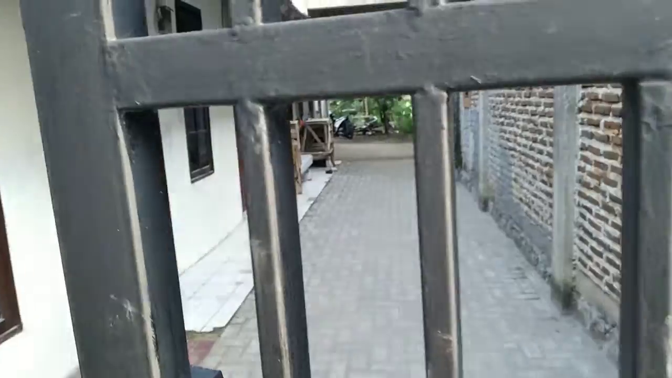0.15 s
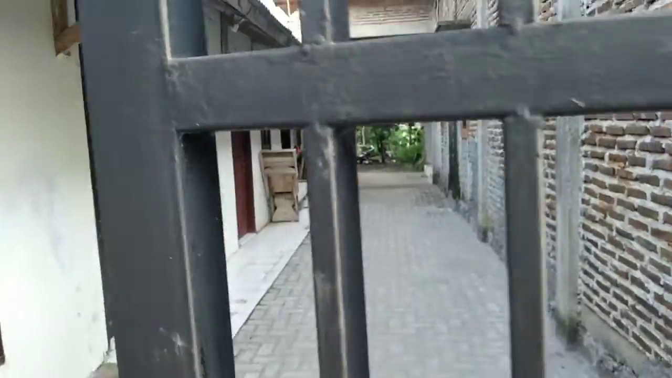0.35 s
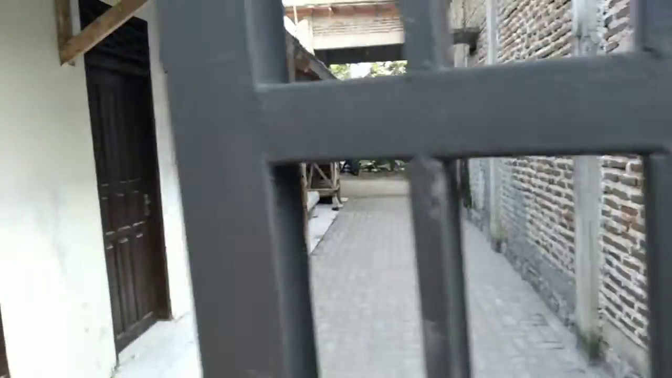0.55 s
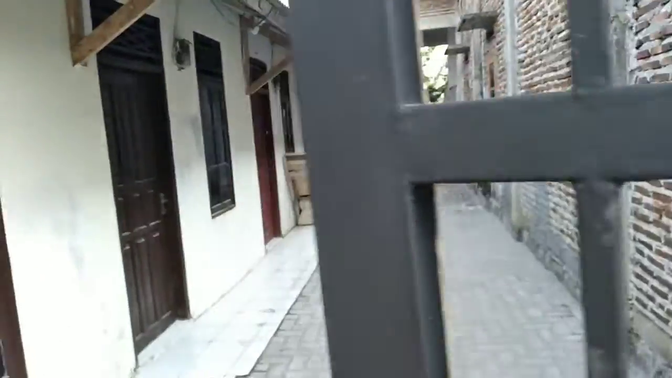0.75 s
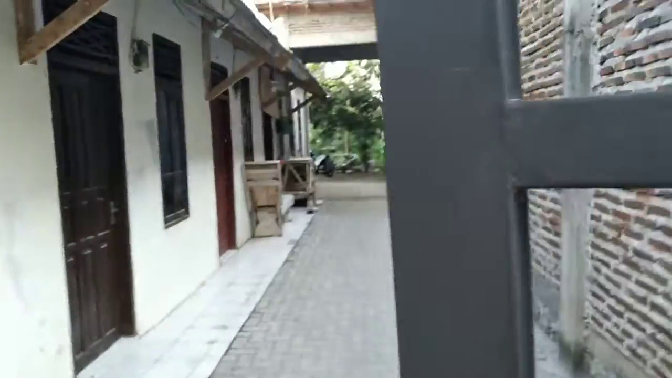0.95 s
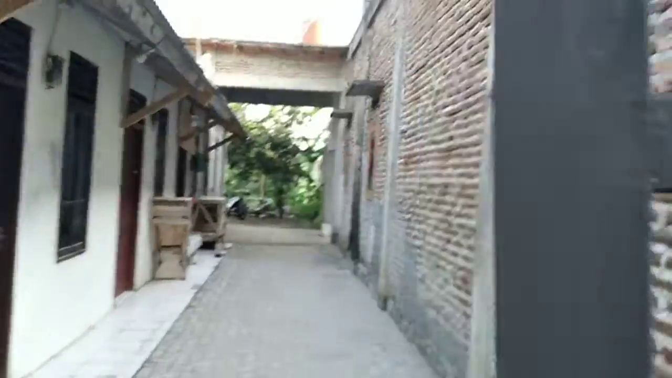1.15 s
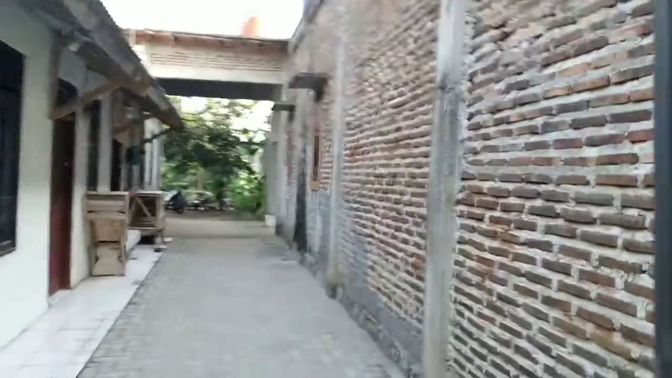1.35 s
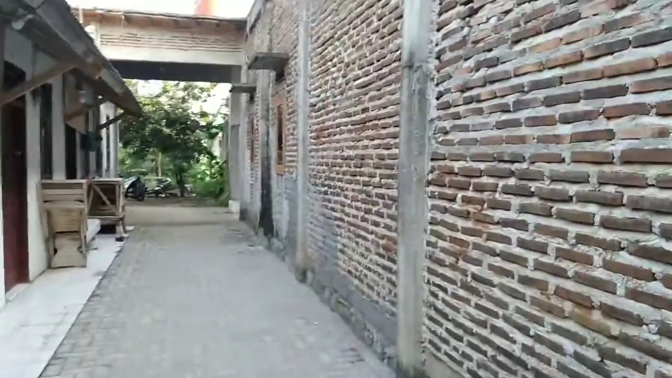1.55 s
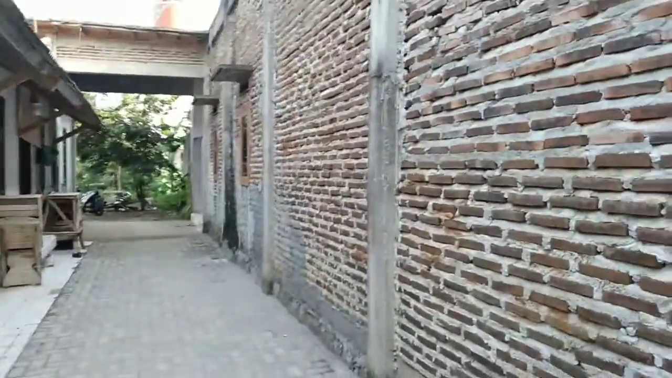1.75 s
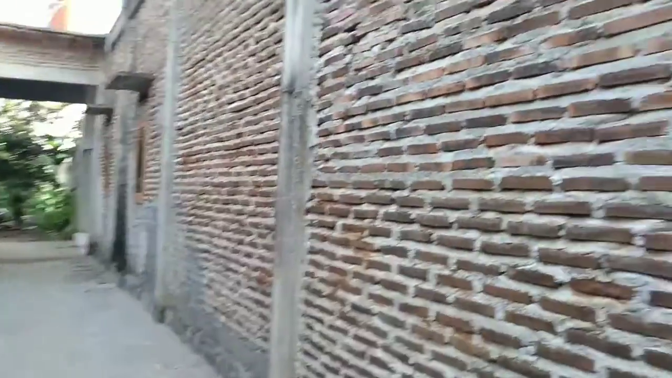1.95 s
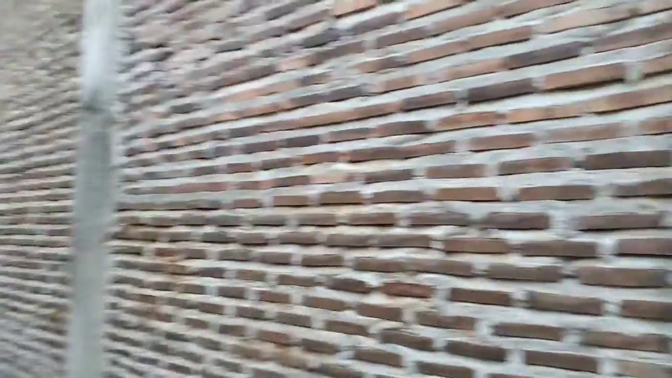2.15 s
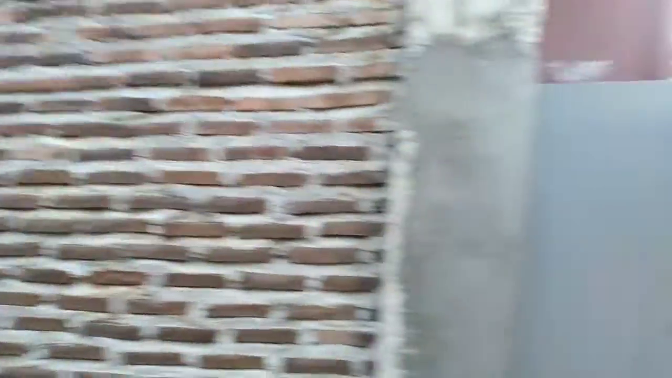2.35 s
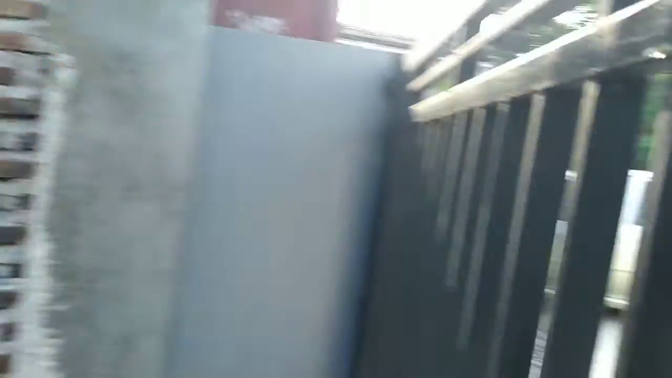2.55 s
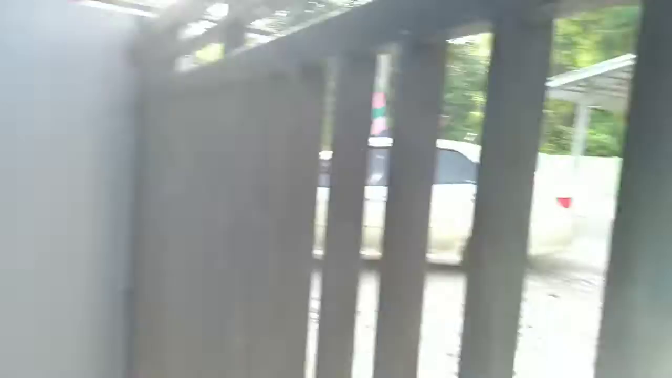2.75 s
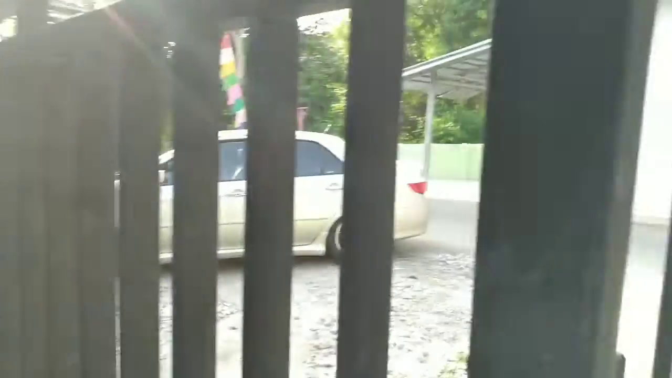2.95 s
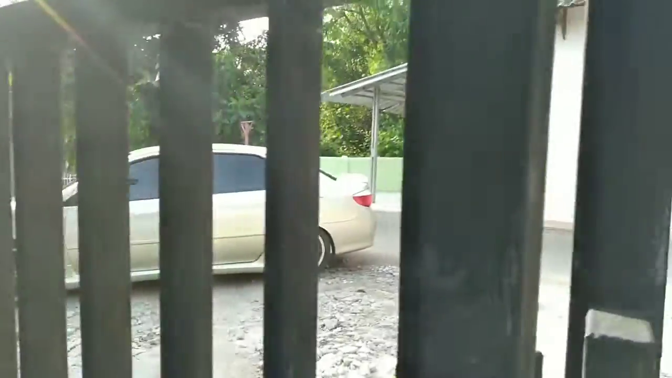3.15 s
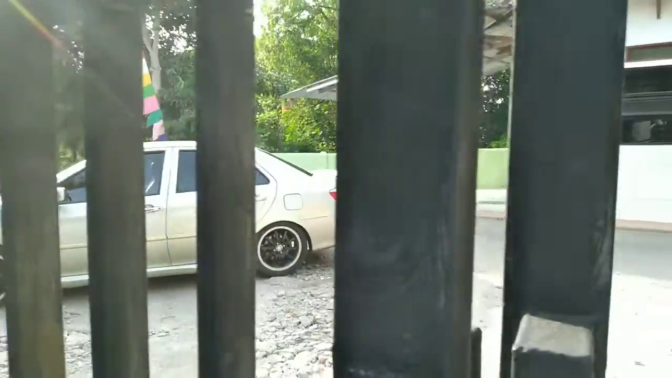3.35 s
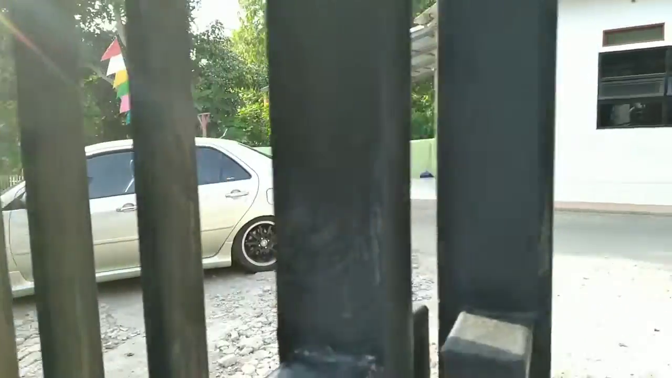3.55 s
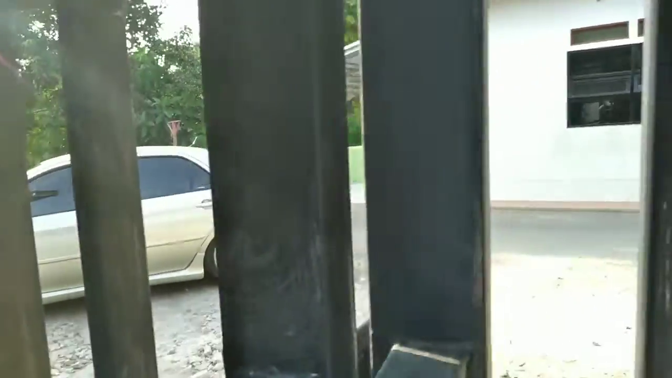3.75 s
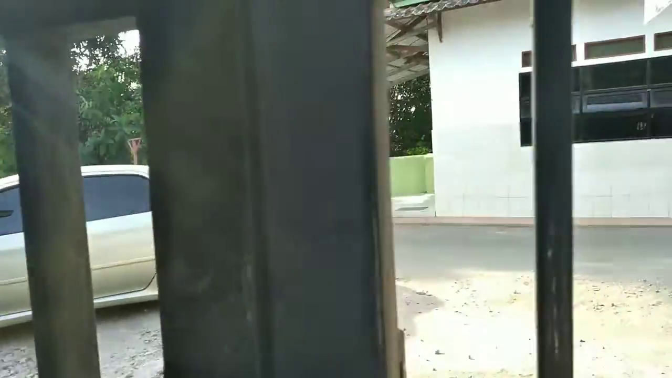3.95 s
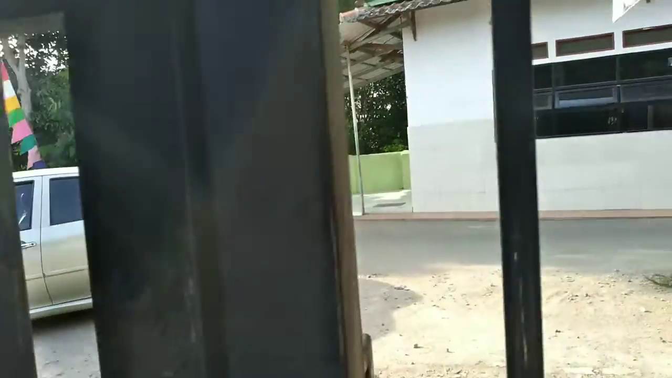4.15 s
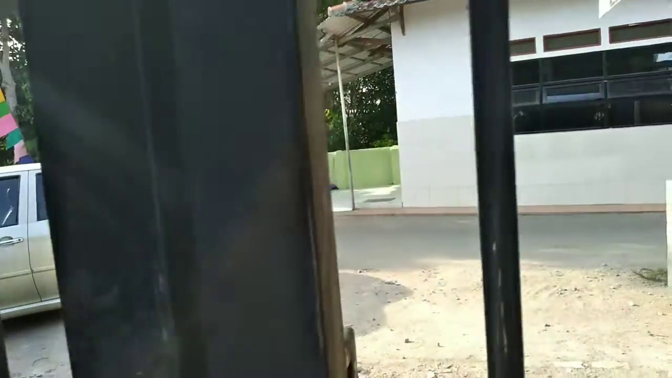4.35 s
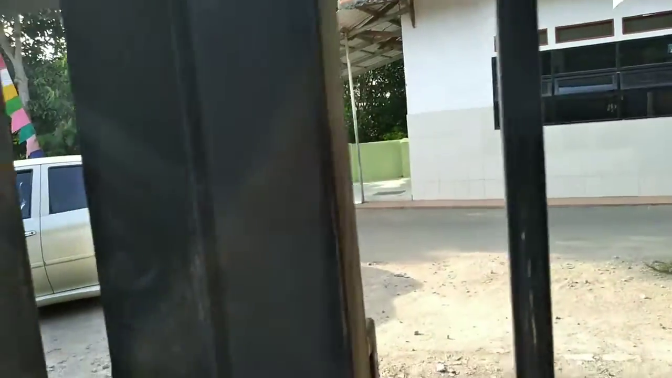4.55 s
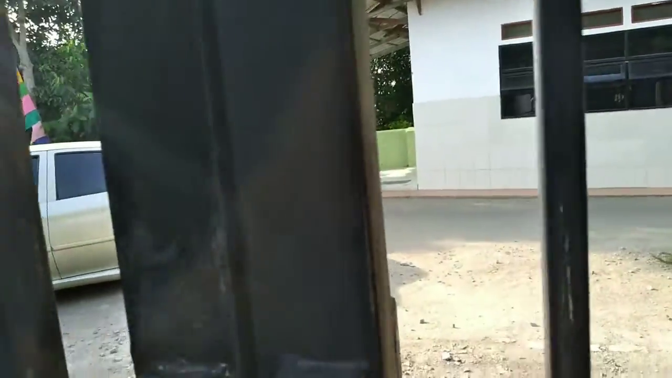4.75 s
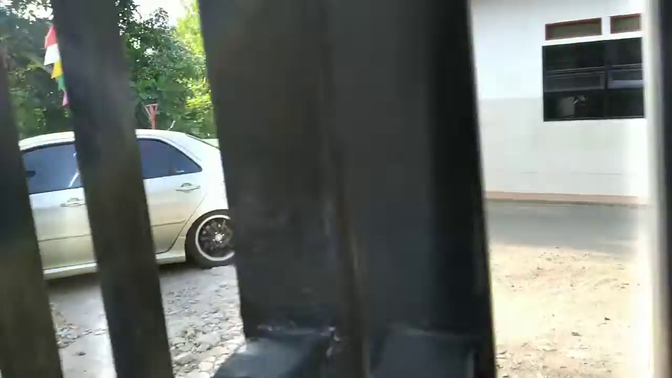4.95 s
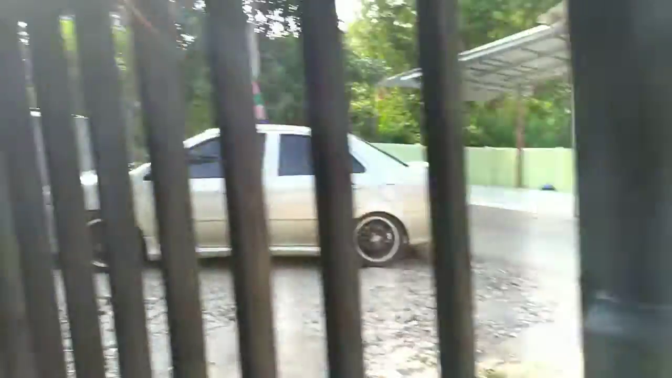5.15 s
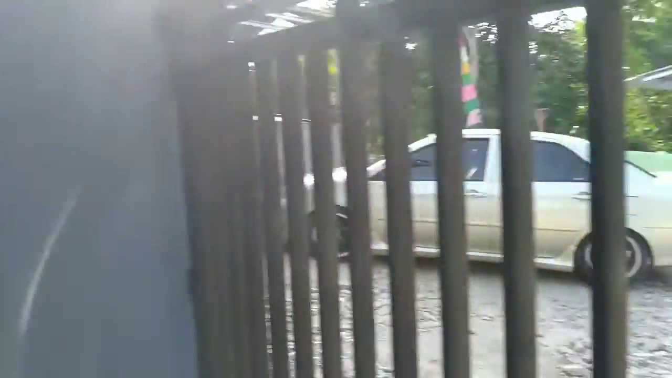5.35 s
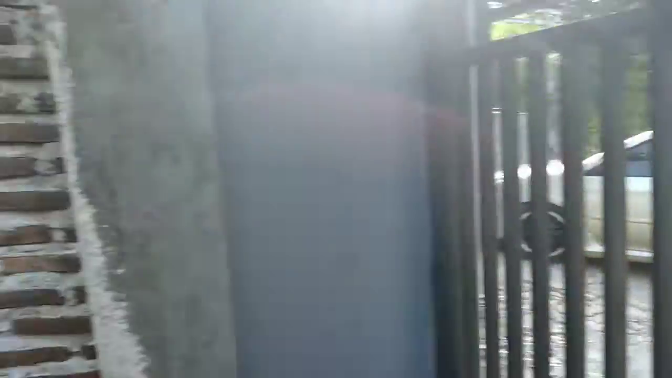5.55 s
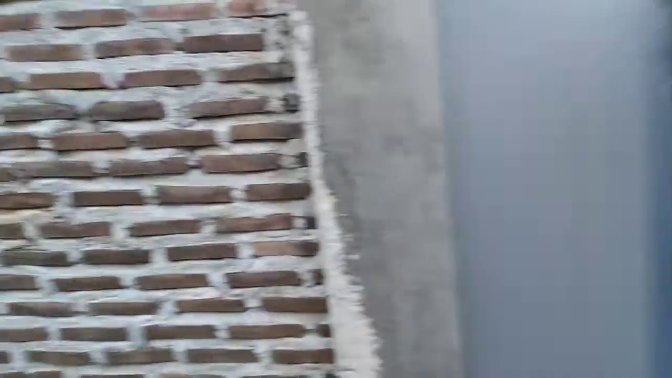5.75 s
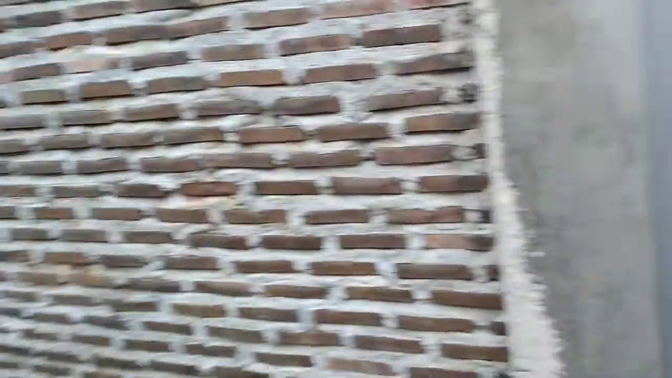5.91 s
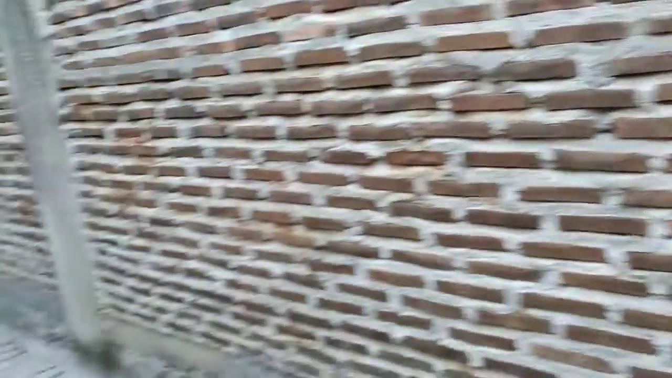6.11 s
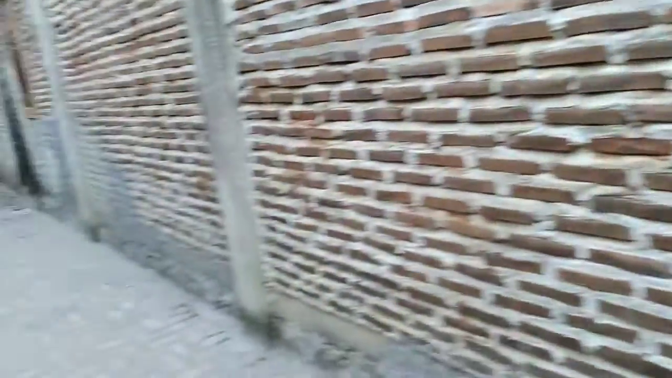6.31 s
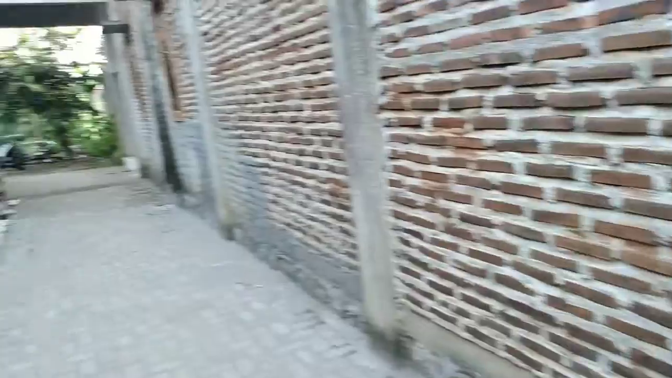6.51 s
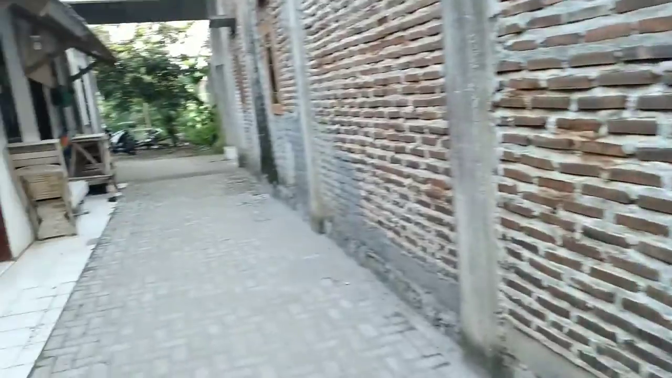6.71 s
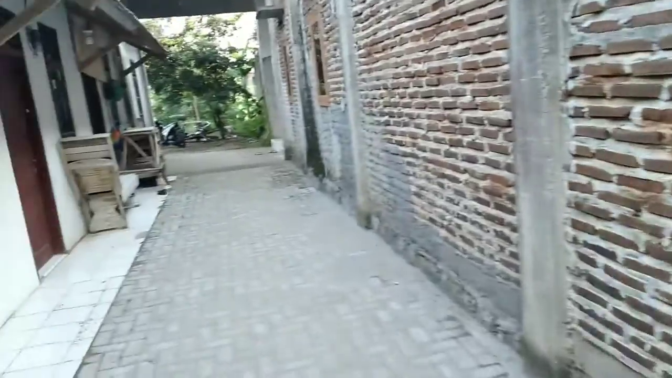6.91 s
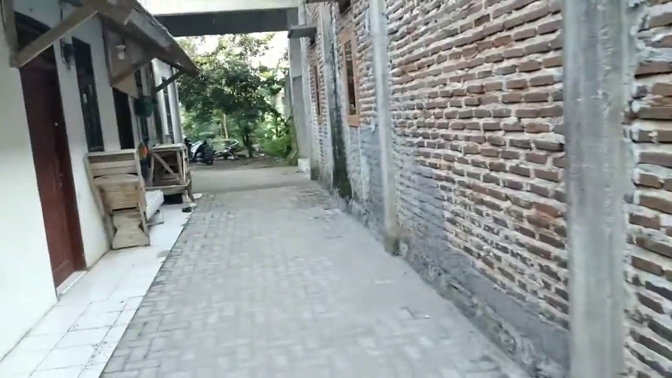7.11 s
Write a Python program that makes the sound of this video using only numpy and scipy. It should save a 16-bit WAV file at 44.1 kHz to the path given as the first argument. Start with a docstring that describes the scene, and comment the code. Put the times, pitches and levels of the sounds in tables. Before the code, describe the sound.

Handheld close-up outdoors: low town rumble, faint motor hum and light wind on the microphone. First light gate taps and humming bars, then grainy shoe scuffs, a faint squeak and a few clicks. Around the middle comes a loud clattering steel slam, several uneven blows with latch ringing, overloading the left side. Afterwards only rustling steps and patchy hiss, with treble dropping out abruptly between sounds.

```python
"""A steel bar gate is pushed open in a brick alley, then slammed so that bars and latch rattle.
Blows mix a noisy clatter with dying sines; loose clinks keep striking the bars, which hum as it swings.
The walker's scuffs are grainy hiss; dry clicks, light taps and a faint squeak fall between them.
Town rumble, a motor hum and light wind lie beneath; between sounds the treble drops out abruptly.
The loudest blows overload the left microphone."""
import sys
import numpy as np
from scipy import signal
from scipy.fft import rfft, irfft
from scipy.io import wavfile
from scipy.ndimage import uniform_filter1d

SR = 44100
rng = np.random.default_rng(int(sys.argv[2]) if len(sys.argv) > 2 else 0)


def persist_wave(psi):
    """Save psi, clipped to +-1, as 16-bit WAV."""
    counts = np.round(np.clip(psi, -1, 1) * 32767).astype(np.int16)
    wavfile.write(sys.argv[1], SR, np.atleast_2d(counts).T)


N = 316630

# Blows on the gate: (time [s], level before pan and mix [dB], brightness [dB],
# chatter before the fade, held to 2-100 ms [s])
GATE_BLOWS = [(0.481, -42, -5.5, 0.085), (0.585, -35, -3.5, 0.0024), (1.039, -44.5, -14.5, 0.015),
              (1.074, -41.5, 1, 0.021), (1.097, -36, -6, 0.021), (3.984, -26, -21, 0.02),
              (4.011, -22.5, -9, 0.037), (4.225, -13, 7, 0.018), (4.382, -22.5, -1.5, 0.0027),
              (4.474, -27.5, -5, 0.0058), (4.535, -22.5, -5.5, 0.0019), (4.589, -24.5, -4.5, 0.044),
              (4.622, -17.5, -3.5, 0.0097), (4.638, -4.5, 0.5, 0.025), (4.745, -20.5, -10.5, 0.038),
              (4.792, -9, 2.5, 0.016), (4.837, -19, -13.5, 0.03), (4.981, -34.5, -16.5, 0.081),
              (5.082, -28, -8, 0.034), (5.33, -36, 2, 0.0022)]
# Ringing bars of the gate: (pitch [Hz], relative level [dB], base t60 [s])
BAR_MODES = [(250, -14, .2), (302, -16, .18), (434, -9, .2), (540, -10, .15), (738, -7, .12), (841, 4, .3),
             (915, 0, .18), (1004, -7, .13), (1185, -8, .12), (1423, -8, .12), (1884, -4, .12),
             (2126, -7, .13), (2443, -3, .11), (2623, -4, .1), (2780, -6, .09), (3090, -9, .12),
             (3944, -9, .07), (4414, -21, .16), (5800, -20, .08), (6630, -27, .17)]
# Base decay of the frame and its small parts: (frequency [Hz], t60 [s])
FRAME_DECAY = [(800, 0.67), (2500, 0.33), (5000, 0.15), (10000, 0.12)]
# Spectrum of gritty hiss, under the sole and in the alley: (frequency [Hz], relative level per Hz [dB])
GRIT_SPECTRUM = [(250, -14), (600, -1.5), (1200, -3), (2200, 4.5), (3300, 0), (5500, -6), (8200, -3),
                 (10300, -16.5), (15000, -35)]


def amp(db):
    """Turns decibels into an amplitude factor."""
    return 10 ** (np.asarray(db) / 20)


def evened(x):
    """Scales a signal to unit RMS."""
    return x / np.sqrt(np.mean(abs(x) ** 2) + 1e-20)


def read(points, hz):
    """Reads a curve of (frequency, value) points on a logarithmic frequency axis."""
    f, value = np.transpose(points)
    return np.interp(np.log(hz + 1), np.log(f + 1), value)


def add(mix, s, sound):
    """Lays a stereo sound into the mix at s seconds, cutting it at the end."""
    part = mix[:, round(s * SR):][:, :sound.shape[1]]
    part += sound[:, :part.shape[1]]


def panned(db):
    """Gains that make the left louder than the right by db."""
    return amp([[db / 2], [-db / 2]])


def colour_db(hz, treble_db, bass_db, knee_hz=450):
    """Lifts or lowers the top and the bottom of a spectrum."""
    curve = [(knee_hz, bass_db), (2 * knee_hz, 0), (2400, 0.24 * treble_db), (6000, treble_db)]
    return read(curve, hz)


def ports(count, size, field_db, patchy_db, likeness=0.88):
    """Noise at two microphone ports, likeness falling with pitch; field_db(hz, t) shapes its level."""
    # Left-right likeness before the likeness factor: (frequency [Hz], share [0-1])
    port_likeness = [(60, .93), (250, .87), (1000, .7), (8000, .75)]
    # Phase by which the left leads: (frequency [Hz], phase [rad])
    left_lead = [(20, 0.1), (800, 0.1), (2400, 1.6), (3450, 4.08), (8300, 4.9)]
    hop = size // 4
    frames = count // hop + 5
    hz = np.fft.rfftfreq(size, 1 / SR)[:, None]
    a, b, c, d, patches = rng.standard_normal((frames, len(hz), 5)).T
    # Smoothing over frequency and time makes the level drift in patches
    patches = uniform_filter1d(uniform_filter1d(patches, size=5, axis=0), size=12, axis=1)
    patches = evened(patches)
    same = np.clip(likeness * read(port_likeness, hz), 0, 1)
    left = a + 1j * b
    right = same * left + np.sqrt(1 - same ** 2) * (c + 1j * d)
    right = right * np.exp(-1j * read(left_lead, hz))
    level_db = field_db(hz, np.arange(frames) * hop / SR) + patchy_db * patches
    spectrum = np.array([left, right]) * amp(level_db)
    return signal.istft(spectrum, nperseg=size, noverlap=size - hop)[1][:, :count]


def damped(t, hz, db, t60, alike_hz=2800):
    """Dying sines with a soft start, their phases at the two ports drifting apart with pitch."""
    start, apart = 2 * np.pi * rng.random((2, len(hz), 1))
    phase = start + np.array([0, 1])[:, None, None] * apart * np.minimum(hz / alike_hz, 1)
    sines = amp(db - 60 * t / t60) * np.sin(2 * np.pi * hz * t + phase)
    soft_start = 1 - np.exp(-(t / 0.00018) ** 2)
    return sines.sum(axis=1) * soft_start


def rumble():
    """Distant town noise: low, drifting in patches, leaning left by an amount that varies with pitch."""
    # Spectrum of the town: (frequency [Hz], relative level per Hz [dB])
    town_spectrum = [(15, -6), (64, -8.5), (90, -14), (190, -14.5), (380, -25), (500, -32.5), (900, -46),
                     (1300, -62.5), (2300, -58), (4500, -72.5), (9000, -69.5), (12000, -93)]
    # Lean to the left: (frequency [Hz], left-right level difference added [dB])
    town_lean = [(40, 9.5), (250, 3), (2000, 6.5)]
    level_db = -43.5
    sound = ports(N, 2048, lambda hz, t: read(town_spectrum, hz) + 0 * t, 0.48)
    hz = np.fft.rfftfreq(N, 1 / SR)
    lean = amp(np.outer([.5, -.5], read(town_lean, hz)))
    return amp(level_db) * evened(irfft(rfft(sound) * lean, N))


def hum():
    """A distant motor: two slightly wavering sines, fading as the walker turns away."""
    # Motor lines: (centre pitch [Hz], level before fade and pan [dB])
    motor_lines = [(199, -58), (377, -64)]
    t = np.arange(N) / SR
    drift = rng.standard_normal((len(motor_lines), N))
    waver = 1 + 0.003 * evened(uniform_filter1d(drift, size=9000))
    hz, db = np.transpose(motor_lines)[..., None]
    lines = amp(db) * np.sin(2 * np.pi * np.cumsum(hz * waver, axis=1) / SR)
    fade = np.clip(3.2 - t, .2, 1)
    return panned(2.5) * lines.sum(axis=0) * fade


def wind():
    """Lumpy low air on the ports, mostly the left one, with two soft bumps."""
    # Strength of the air before pan: (time [s], level [dB])
    air_level = [(0, -56), (2.4, -56), (2.75, -48), (3.2, -54), (4.6, -50), (5.9, -47), (7.18, -52)]
    # Bumps of air on the port: (time [s], signed height factor)
    air_bumps = [(2.671, 0.027), (2.827, -0.024)]
    spectrum = [(15, -12), (45, 7.5), (90, -12.5), (300, -63.5)]  # (Hz, dB per Hz)
    s, level_db = np.transpose(air_level)
    air = evened(ports(N, 2048, lambda hz, t: read(spectrum, hz) + 0 * t, 2))
    air = air * amp(np.interp(np.arange(N) / SR, s, level_db))
    u = np.arange(3000) / SR / 0.0052
    bump = u ** 2 * (4.1 - u) * np.exp(-u)  # pushes one way, then swings back
    for at, height in air_bumps:
        add(air, at, height * np.tile(bump, (2, 1)))
    return panned(10) * air


def alley_hiss():
    """Steady patchy hiss of the alley, spread over both ports."""
    return panned(2.2) * evened(ports(N, 256, lambda hz, u: read(GRIT_SPECTRUM, hz) + 0 * u, 2.0))


def treble_spans():
    """Gains for the bright sounds and the alley hiss, opening and closing within milliseconds."""
    # Spans in which the treble is open: (start [s], end [s], alley hiss level before swell and pan [dB])
    open_spans = [(0.038, 0.054, -64), (0.202, 0.267, -59.5), (0.363, 0.432, -63), (0.487, 0.872, -59.5),
                  (1.034, 1.479, -55.5), (1.534, 1.845, -54.5), (1.866, 2.412, -61), (2.416, 2.646, -82),
                  (2.877, 3.088, -54.5), (3.216, 3.392, -66.5), (3.629, 3.776, -61), (3.977, 5.47, -62),
                  (5.47, 5.582, -64), (5.583, 6.038, -62), (6.205, 6.32, -73), (6.485, 6.607, -58.5),
                  (6.623, 6.665, -68), (6.678, 6.822, -59.5), (7.055, 7.194, -54.5)]
    hiss_swell_s = 0.034
    t = np.arange(N) / SR
    passing, hiss_gain = np.zeros(N), np.zeros(N)
    for start, end, hiss_db in open_spans:
        span = np.clip(np.minimum(2 * (t - start), end - t) / .007, 0, 1)
        swell = np.clip(np.minimum(t - start, end - t) / hiss_swell_s, .35, 1)
        passing = passing + span
        hiss_gain = hiss_gain + amp(hiss_db) * span * swell
    # A trace of the bright sounds remains between spans; the hiss goes silent
    return np.clip(passing, .06, 1), hiss_gain


def squeak(s, length, hz, level_db):
    """A thin tone roughened by fast random pitch waver, swelling and fading over its length."""
    t = np.arange(round(length * SR)) / SR
    drift = rng.standard_normal(round(.2 * SR))
    waver = 1 + .03 * evened(uniform_filter1d(drift, size=120))[:len(t)]
    tone = np.sin(2 * np.pi * np.cumsum(hz * waver) / SR)
    return s, amp(level_db) * panned(6.5) * np.sin(np.pi * t / length) * tone


def click(s, level_db, hz):
    """A few dying cycles, then a short noise splash off the walls."""
    t = np.arange(1500) / SR
    snap = np.sin(2 * np.pi * hz * t) * np.exp(-t * hz / 3.1) * (1 - np.exp(-t * hz / 0.5))
    walls = rng.standard_normal((2, len(t))) * amp(-22 - 60 * t / 0.049)
    splash = signal.oaconvolve(walls, snap[None])[:, :len(t)]
    return s, amp(level_db) * panned(10.7) * (snap + splash)


def scuff(s, level_db, t60, low_db):
    """Grit under a sole: grainy hiss that swells and dies, with less fizz the heavier the step."""
    t = np.arange(round(.5 * SR)) / SR
    rise_s = 0.044
    treble_db = -4.2 - 0.31 * low_db
    field = lambda hz, u: read(GRIT_SPECTRUM, hz) + colour_db(hz, treble_db, low_db, 596) + 0 * u
    hiss = evened(ports(len(t), 256, field, 1.8))
    grains = uniform_filter1d(rng.exponential(1, len(t)) ** 2, size=60)
    grit = evened(amp(evened(grains)))
    swell = np.sin(np.pi / 2 * np.minimum(t / rise_s, 1)) ** 0.63
    fade = amp(-60 * np.maximum(t - rise_s, 0) / t60)
    return s, panned(4.7) * amp(level_db) * hiss * grit * swell * fade


def swing():
    """Small uneven slips in the hinge keep the bars humming while the gate moves."""
    # Spans of gate movement: (start [s], end [s], level before edges, fade and pan [dB])
    moving_spans = [(0.49, 0.876, -54), (1.03, 1.453, -49), (5.661, 5.837, -50)]
    # Tone of the swinging bars: (frequency [Hz], level added [dB])
    swing_colour = [(850, -8), (2600, -3.5), (4000, -11.5)]
    slips_per_s, fade_db_per_s = 120, -19
    t = np.arange(N) / SR
    ring = np.arange(round(.3 * SR)) / SR
    moving = np.zeros(N)
    for start, end, level_db in moving_spans:
        edges = np.clip(np.minimum(t - start, end - t) / 0.032, 0, 1)
        moving = moving + amp(level_db + fade_db_per_s * np.maximum(t - start, 0)) * edges
    slips = evened(rng.standard_normal(N) * (rng.random(N) < slips_per_s / SR))
    hz, db, t60 = np.transpose(BAR_MODES)[..., None]
    bars = damped(ring, hz, db + read(swing_colour, hz), 0.62 * t60)
    bars = bars / np.linalg.norm(bars[0])
    return panned(9.2) * signal.oaconvolve(bars, (slips * moving)[None], axes=1)[:, :N]


def tap(s, level_db, hz):
    """A light tap on small steel parts: a cluster of close modes round one pitch, quickly dead."""
    t = np.arange(round(.2 * SR)) / SR
    pitch_draw, level_draw = rng.standard_normal((2, 20, 1))
    modes_hz = hz * (1 + 0.082 * pitch_draw)
    modes = damped(t, modes_hz, level_db + 3 * level_draw, .75 * read(FRAME_DECAY, modes_hz))
    return s, panned(4) * modes * (1 - np.exp(-t * hz / 8))


def latch(s, level_db, hz):
    """The loose latch rings one clean sine, its pitch set by where it rests, until the next blow."""
    ring_t60, damp_s = 0.45, .012  # damp_s: time constant once the next blow lands
    t = np.arange(round(.4 * SR)) / SR
    next_s = min(row[0] for row in GATE_BLOWS if row[0] > s)
    ring = damped(t, np.array([[hz]]), level_db, ring_t60, 7600) * np.minimum(t / .008, 1)
    return s, panned(3.0) * ring * np.exp(-np.maximum(t - (next_s - s), 0) / damp_s)


def blow(s, level_db, treble_db, chatter):
    """Steel chatters on steel: the frame clatters, loose clinks keep striking bars and small parts."""
    # Clatter of the whole frame: (frequency [Hz], relative level per Hz [dB])
    frame_spectrum = [(60, -31.5), (250, -6), (550, -11.5), (840, -10.5), (1450, -14.5), (2420, -5),
                      (5550, -21.5), (8200, -13), (10300, -35), (15000, -62)]
    small_parts = 90  # close-packed modes of welds, plates and rails; each blow wakes others
    parts_db, parts_ring = -5, .4  # level over the frame spectrum [dB], share of its decay time
    t = np.arange(round(.55 * SR)) / SR
    # A duller blow puts more into the bass and dies more slowly
    bass_db = -6.5 - 0.45 * treble_db
    decay = 0.93 - 0.017 * treble_db  # factor on the decay times
    chatter = np.clip(chatter, .002, .1)

    fade = lambda u, t60: -60 * np.maximum(u - chatter, 0) / (decay * t60)
    colour = lambda hz: colour_db(hz, treble_db, bass_db)
    field = lambda hz, u: read(frame_spectrum, hz) + colour(hz) + fade(u, read(FRAME_DECAY, hz))
    clatter = ports(len(t), 256, field, 3.2, .75)
    clatter /= np.sqrt(np.mean(clatter[:, :900] ** 2))

    # About 450 random contacts a second, fading once the chatter is over
    clinks = rng.standard_normal(len(t)) * (rng.random(len(t)) < 450 / SR) * amp(fade(t, 0.31))
    clinks[0] = 2.4  # the first contact
    clinks /= np.linalg.norm(clinks)

    hz, db, t60 = np.transpose(BAR_MODES)[..., None]
    db = db + colour(hz) + 3.1 * rng.standard_normal(hz.shape)  # the strike spot varies
    parts_hz = 1100 * 6 ** rng.random((small_parts, 1))
    parts_level = parts_db + read(frame_spectrum, parts_hz) + colour(parts_hz)
    parts_level = parts_level + 3 * rng.standard_normal(parts_hz.shape)
    parts_t60 = parts_ring * decay * read(FRAME_DECAY, parts_hz)
    ring = t[:len(t) // 2]
    modes = damped(ring, hz, db, .9 * decay * t60) + damped(ring, parts_hz, parts_level, parts_t60)
    modes = modes * np.cos(np.pi / 2 * ring / ring[-1])  # brings the ring to zero at its end
    struck = signal.fftconvolve(modes, clinks[None], axes=1)[:, :len(t)]

    # Each clink flares in the clatter
    flares = abs(evened(clinks / amp(fade(t, 0.2))))
    grain = 1 + 0.5 * uniform_filter1d(uniform_filter1d(flares, size=30), size=20)
    onset = 1 - np.exp(-t / 0.00038)
    mixed = amp(-2.0) * clatter * evened(grain) * onset + amp(-1.0) * struck
    return s, amp(level_db) * panned(4.5) * mixed


def scene():
    """Bright sounds and the alley hiss cut in and out abruptly; the low background and squeak run on."""
    # Faint squeaks: (time [s], length [s], centre pitch [Hz], level before pan [dB])
    squeak_rows = [(1.864, 0.1, 2650, -63)]
    # Small dry clicks: (time [s], level before pan [dB], pitch [Hz])
    click_rows = [(0.0508, -41, 1990), (0.786, -50, 6640), (1.801, -46.5, 1670), (2.041, -20.5, 7830),
                  (2.19, -36.5, 7800), (2.4637, -28, 2070), (6.764, -40, 2270)]
    # Scuffs and rustles: (time [s], level before pan [dB], t60 [s], low-mid lift [dB])
    scuff_rows = [(0.373, -51, 0.27, 24.5), (1.543, -35.5, 0.39, 0.5), (1.982, -37.5, 0.43, -3),
                  (2.239, -39.5, 0.31, -1.5), (2.43, -40.5, 0.57, -5.5), (2.917, -42, 0.33, -17),
                  (3.299, -51, 0.12, -18), (3.69, -56.5, 0.79, -34), (5.477, -49, 0.19, 16),
                  (5.614, -45, 1, -0.5), (5.72, -42, 0.97, -19), (5.898, -39, 0.12, -7),
                  (6.194, -51, 0.28, 23), (6.477, -62, 0.77, 5), (6.745, -57.5, 0.25, 7),
                  (7.057, -51, 0.47, -24)]
    # Light taps on patches of small steel parts: (time [s], base mode level [dB], centre pitch [Hz])
    tap_rows = [(0.524, -54.5, 8160), (0.543, -54, 5930), (0.574, -50, 6600), (2.079, -45, 2316),
                (2.082, -51.5, 4070), (2.285, -57.5, 998), (4.014, -46, 3920), (4.477, -50, 8100)]
    # Rings of the loose latch: (time [s], level before decay and pan [dB], pitch [Hz])
    latch_rows = [(0.495, -39, 2487), (0.586, -35.5, 2336), (4.232, -15.5, 2314), (4.65, -15, 2386),
                  (4.8, -17.5, 2440)]
    squeaks, bright = np.zeros((2, N)), np.zeros((2, N))
    for row in squeak_rows:
        add(squeaks, *squeak(*row))
    sources = ((click, click_rows), (scuff, scuff_rows), (tap, tap_rows),
               (latch, latch_rows), (blow, GATE_BLOWS))
    for source, rows in sources:
        for row in rows:
            add(bright, *source(*row))
    bright = bright + swing()
    bright_gain, hiss_gain = treble_spans()
    background = rumble() + hum() + wind()
    return background + squeaks + alley_hiss() * hiss_gain + bright * bright_gain


def record(dry):
    """The capsule bends one way on loud sound and overloads near full scale; then the band limit."""
    edge_hz = 16300
    clipped = np.clip(dry + 0.03 * dry ** 2, -.97, .97)
    lowpass = signal.firwin(255, edge_hz, window=("kaiser", 7), fs=SR)
    return signal.oaconvolve(clipped, lowpass[None], "same")


dry = scene()
out = record(dry)
persist_wave(out)
```